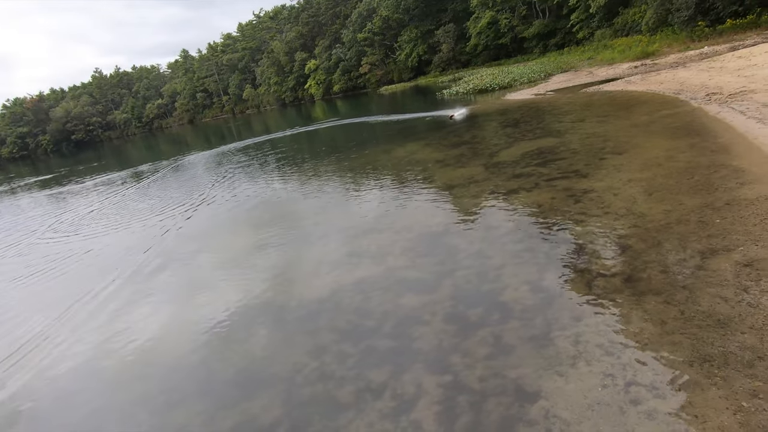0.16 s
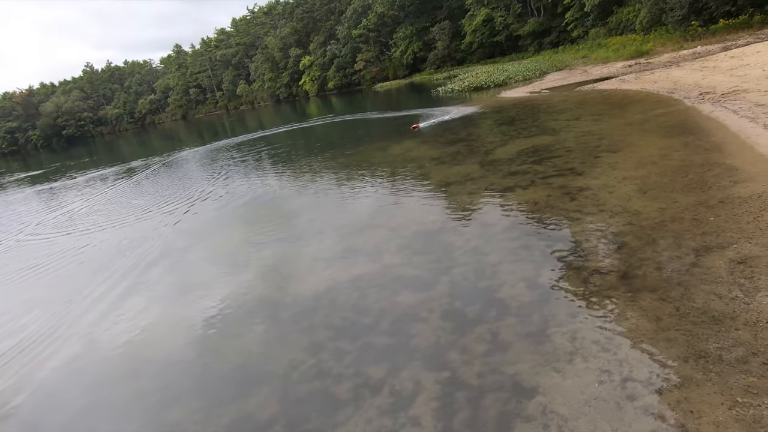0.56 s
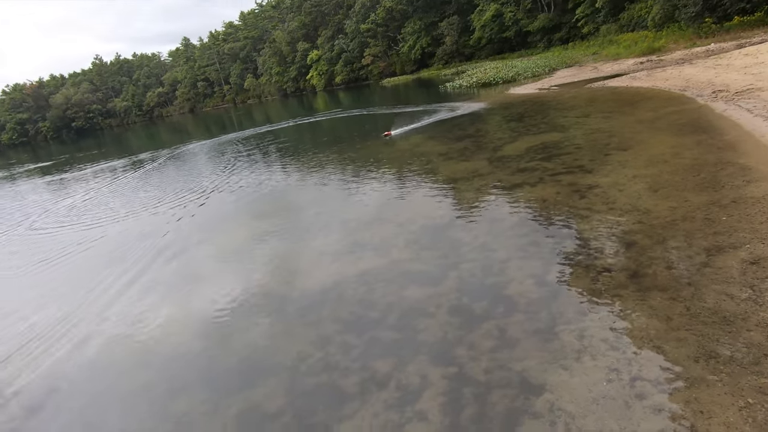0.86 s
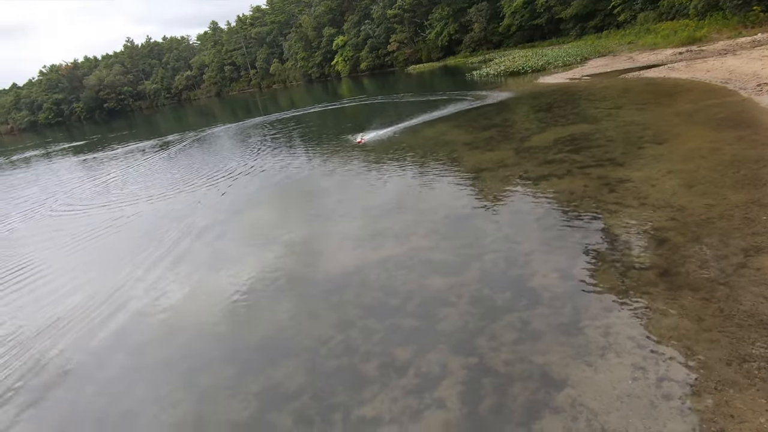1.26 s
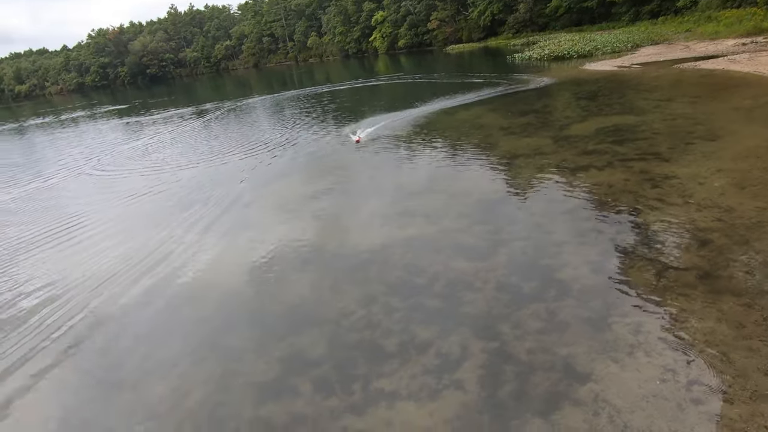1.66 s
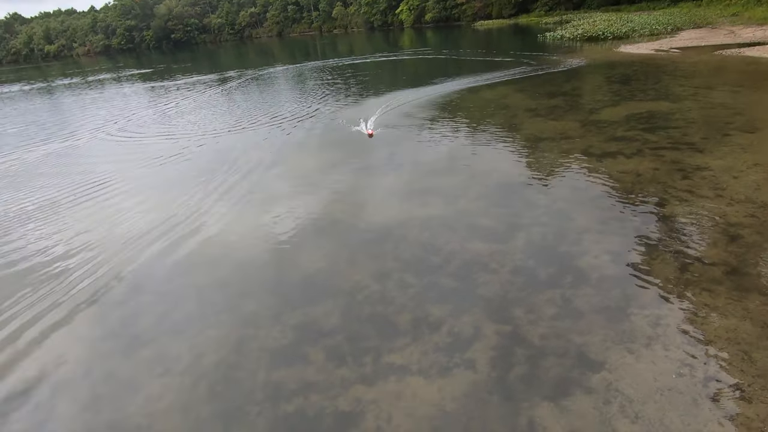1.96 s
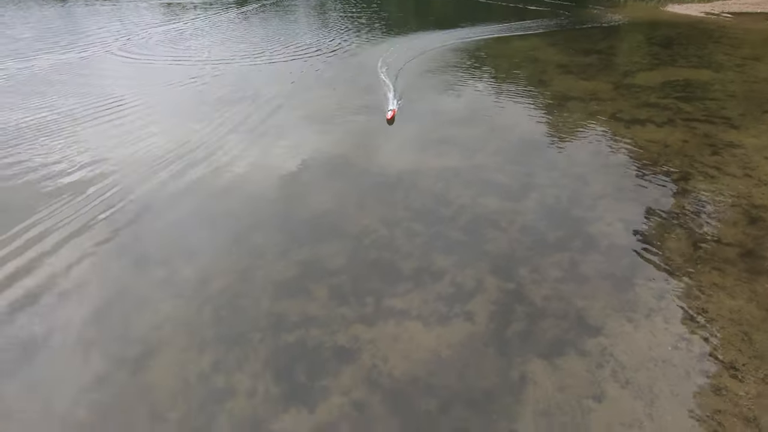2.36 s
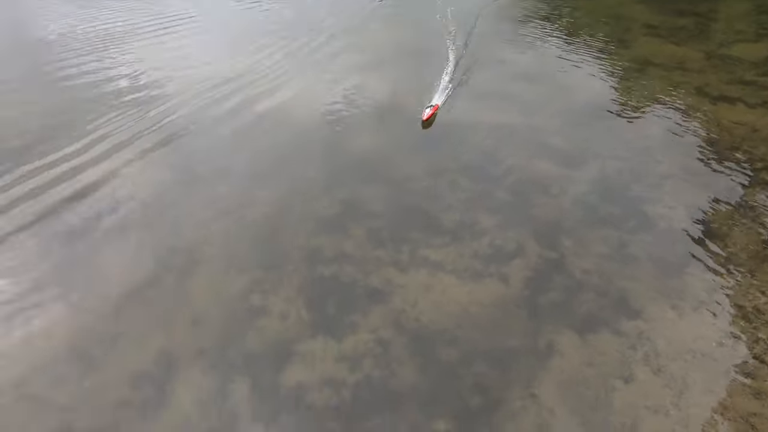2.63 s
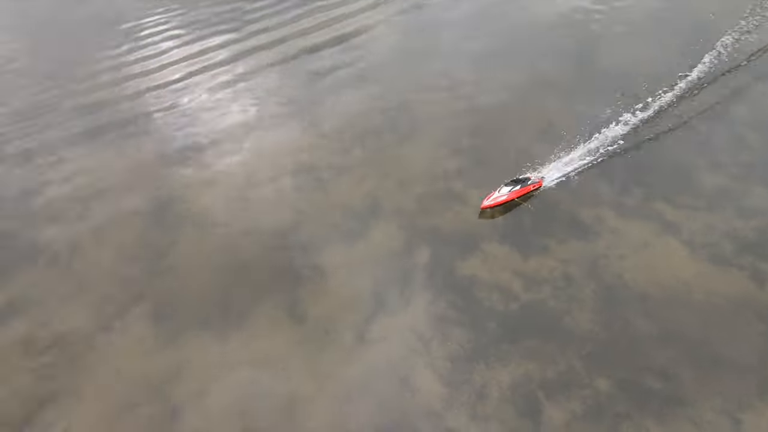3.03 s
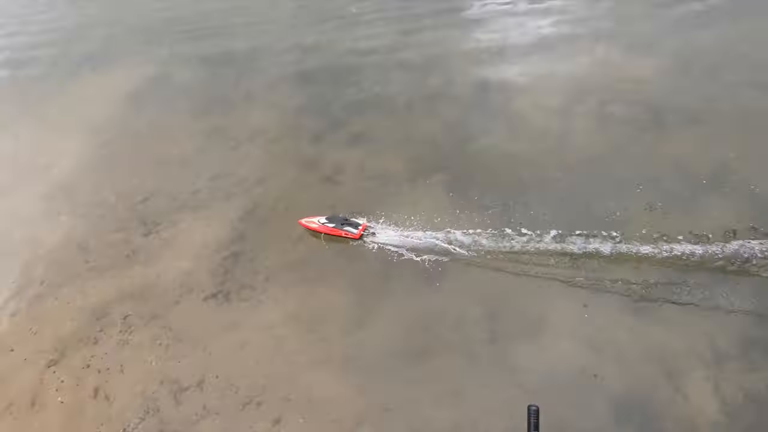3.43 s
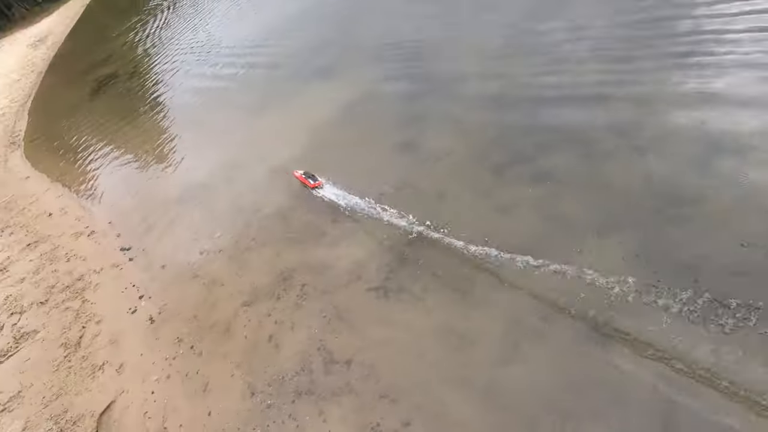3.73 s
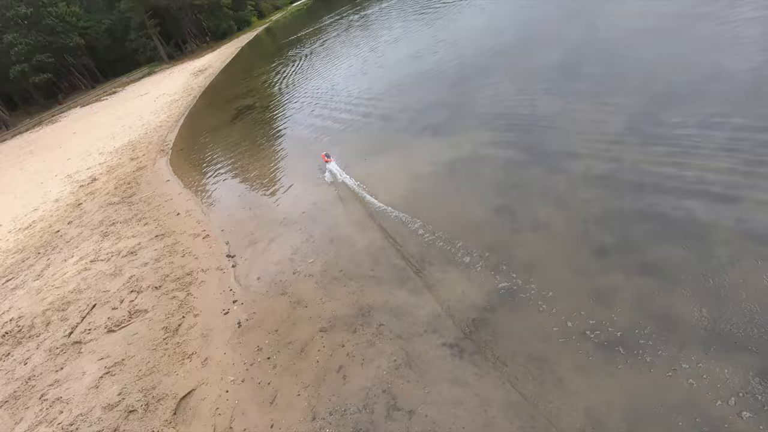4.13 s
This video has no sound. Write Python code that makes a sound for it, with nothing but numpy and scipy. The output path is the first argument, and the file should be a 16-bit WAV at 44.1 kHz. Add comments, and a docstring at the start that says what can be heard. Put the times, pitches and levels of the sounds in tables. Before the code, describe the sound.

A small electric model speedboat is heard from a lake shore, at first fairly distant: a buzzy, many-toned motor whine with a soft hiss of churned water. In the first half second the pitch flicks up briefly as the propeller lifts clear, then stays nearly steady while the tone colour keeps shifting. Light wind puffs on the microphone over a faint low rumble. From about 2 seconds, whine and water grow steadily louder. The boat passes close between about 3 and 3.7 seconds, slightly to the right, with a stronger hum, rushing spray and small splashes from the hull slapping waves. The strongest gust gives a low buffet at about 3.2 seconds, more on the left. From about 3.8 seconds the whine and churn fade as the boat leaves, and a fine mist brightens the hiss, still audible at the end near 4.3 seconds.

```python
"""A small electric model speedboat comes round a lake, its two-bladed propeller briefly racing clear of the
water. Motor and propeller whine through the hull, a stack of tones whose balance turns with the heading,
while the churned water hisses in step with the blades and a light wind buffets both microphone ports.
Just after three seconds the boat passes close by the shore, slapping waves as the strongest gust hits.
Then whine and churn fade as it leaves, and a fine mist brightens the hiss."""
import sys
import numpy as np
from scipy import signal
from scipy.fft import rfft, irfft
from scipy.io import wavfile
from scipy.ndimage import uniform_filter1d

SR = 44100
rng = np.random.default_rng(int(sys.argv[2]) if len(sys.argv) > 2 else 0)


def inscribe(sig):
    """Save sig as 16-bit PCM at rate SR to the path in sys.argv[1].

    A 1-D sig is mono; a 2-D sig holds one channel per row.
    Samples are clipped to [-1, 1] before scaling.
    """
    pcm = np.round(np.clip(np.atleast_2d(sig).T, -1, 1) * 32767)
    wavfile.write(sys.argv[1], SR, pcm.astype(np.int16))


N = 189365


def amp(db):
    """Decibels to gain."""
    return 10 ** (np.asarray(db) / 20)


def unit_rms(x):
    """Normalises to rms 1."""
    return x / np.sqrt(np.mean(abs(x) ** 2) + 1e-20)


def at_hz(points, hz):
    """Reads an EQ-style curve on a log frequency axis."""
    f, value = np.transpose(points)
    return np.interp(np.log(hz + 1), np.log(f + 1), value)


def lane(rows, column, t=None):
    """Plays one column of a table as an automation lane."""
    rows = np.array(rows)
    return np.interp(np.arange(N) / SR if t is None else t, rows[:, 0], rows[:, column])


def swells(rows, column, rise_s, fall_s):
    """An envelope with one bell-shaped swell per row, peaking at the row's time."""
    t = np.arange(N) / SR
    return sum(row[column] * np.exp(-((t - row[0]) / np.where(t < row[0], rise_s, fall_s)) ** 2)
               for row in rows)


def drift(top_hz, count):
    """Independent slow random modulators of rms 1."""
    white = rng.standard_normal((count, 4096))
    hz = np.fft.rfftfreq(4096, N / SR / 4096)
    slow = irfft(rfft(white) / (1 + (hz / top_hz) ** 2))
    slow /= slow.std(1, keepdims=True)
    return np.array([np.interp(np.linspace(0, 4095, N), np.arange(4096), row) for row in slow])


def pan(db):
    """Left and right gains, mean 1, for a pan given as left minus right in dB."""
    ratio = amp(db)
    return 2 * np.array([ratio, np.ones_like(ratio)]) / (1 + ratio)


# EQ of the wind rumble: f/Hz, level/dB
WIND_EQ = [(12, -26), (20, -14), (38, 5), (54, 11), (76, 4.5), (119, -8.5), (231, -33), (260, -3.5),
           (340, -39), (570, -120)]
# the stronger gusts: peak t/s, level/dB, pan/dB
GUSTS = [(0.0, -59, 0), (0.41, -59, 5), (0.58, -62, 4), (0.83, -53, 0.5), (1.39, -57, 3), (1.5, -58, 1),
         (1.83, -55, 0), (1.92, -64, 0), (2.159, -50.5, 0), (2.51, -59, 1), (2.72, -67, 0), (2.99, -52, 9),
         (3.17, -37.5, 4.5), (3.42, -43, 7), (3.94, -56, 7), (4.2, -64, -1)]


def wind():
    """Gusts buffet the two ports: a lumpy rumble, only partly shared between them."""
    even_n = N + N % 2
    hz = np.fft.rfftfreq(even_n, 1 / SR)
    white = rng.standard_normal((3, even_n))
    shared, left, right = irfft(rfft(white) * amp(at_hz(WIND_EQ, hz)))[:, :N]
    rumble = np.array([left + 0.81 * shared, right + 0.92 * shared])
    rumble *= amp(2.2 * drift(top_hz=8, count=2))
    gusts = [(t, amp(db + side / 2), amp(db - side / 2)) for t, db, side in GUSTS]
    strength = np.array([swells(gusts, port, rise_s=0.056, fall_s=0.06) for port in (1, 2)])
    return unit_rms(rumble) * (amp(-67) + strength)  # a faint floor between gusts


# the pass-by, also riding the water and whine faders: t/s, whine level/dB, water level/dB, nearness/0-1
PASS_BY = [(0.0, -41.5, -46.5, 0), (0.1, -45, -39.5, 0.03), (0.17, -37, -39, 0.3),
           (0.25, -40.5, -43.5, 0.1), (0.33, -38, -44.5, 0), (0.43, -36.5, -42.5, 0.2),
           (0.52, -31.5, -41, 0.37), (0.57, -38, -39.5, 0.17), (0.7, -36.5, -38.5, 0.38),
           (1.03, -35, -36.5, 0.26), (1.09, -40.5, -39.5, 0.2), (1.14, -37.5, -42.5, 0.04),
           (1.27, -36.5, -42, 0.07), (2.08, -36, -42, 0.12), (2.35, -33.5, -36.5, 0.27),
           (2.66, -29, -33, 0.38), (2.85, -28.5, -31, 0.52), (3.13, -23.5, -29.5, 0.44),
           (3.21, -27, -29, 0.88), (3.44, -26, -27, 1), (3.7, -28, -28, 1), (3.85, -29.5, -31.5, 0.52),
           (4.05, -31.5, -33.5, 0.45), (4.29, -34, -37.5, 0.25)]


def nearness(t=None):
    """Crossfade from the far colour (0) to the close colour (1) as the boat passes."""
    return lane(PASS_BY, 3, t)


# stereo width, boat far and near: f/Hz, left-right likeness/0-1
LIKENESS_FAR, LIKENESS_NEAR = [(60, 1), (200, 0.86), (400, 0.71), (1200, 0.8), (1550, 0.17), (1900, 1),
                               (3000, 1), (5000, 0.9), (5700, 0.74), (6800, 0.61), (7600, 0.41),
                               (9300, 0.37), (10500, .15), (14900, .35)], [(60, .3), (200, .8), (400, 1), (1200, 1), (1550, .85),
                                             (1900, 0.74), (3000, 1), (5000, 0.93), (6000, 1), (6800, 0.96),
                                             (8200, .3), (9300, 0.81), (10500, .12), (14900, .2)]
# pan across the spectrum, boat far and near: f/Hz, pan/dB
PAN_FAR, PAN_NEAR = [(60, -6), (400, 2.5), (900, -3.5), (1300, -2.5), (1600, 7), (2000, -1.5), (2700, -3),
                     (4200, -0.5), (5800, 2), (6800, -1.5), (7700, 1), (9000, 1.5), (10700, -10),
                     (12000, 1), (14900, -6)], [(60, 7.5), (400, -1.5), (900, 5), (1300, -1.5), (1700, -0.5), (2100, 1),
                                   (2700, -0.5), (4200, -1.5), (5800, 0.5), (6800, 9), (7500, 5),
                                   (9000, -1.5), (10700, -17.5), (12000, 0), (14900, -3)]
# how far the left port leads: f/Hz, phase/rad
LEFT_LEAD = [(100, -0.5), (1000, 0.67), (1450, 0.8), (1650, -0.35), (2400, 0.82), (3000, 0), (5500, 0),
             (6300, 0.5), (7200, 0.5), (8000, -2), (10000, -1.5), (11500, -5), (15000, 0)]


def hiss(far_eq, near_eq, patchy_db, flicker_db):
    """Stereo noise of rms 1 with drifting patches; its EQ and image morph from far to near."""
    hop = 128
    frames, hz = N // hop + 5, np.fft.rfftfreq(512, 1 / SR)
    left_re, left_im, other_re, other_im, patches = rng.standard_normal((frames, 257, 5)).T
    patches = uniform_filter1d(patches, size=6, axis=0)  # smear over frequency
    patches = unit_rms(uniform_filter1d(patches, size=16, axis=1))  # and over time
    flicker = unit_rms(uniform_filter1d(rng.standard_normal(frames), size=3))
    near = nearness(np.arange(frames) * hop / SR)

    def morph(far_curve, near_curve):
        return at_hz(far_curve, hz)[:, None] * (1 - near) + at_hz(near_curve, hz)[:, None] * near

    colour = amp(morph(far_eq, near_eq))
    colour /= np.sqrt((colour ** 2).mean(0))
    likeness = np.clip(morph(LIKENESS_FAR, LIKENESS_NEAR), 0, 1)
    left = left_re + 1j * left_im
    right = likeness * left + np.sqrt(1 - likeness ** 2) * (other_re + 1j * other_im)
    right *= np.exp(-1j * at_hz(LEFT_LEAD, hz))[:, None]
    spectra = np.array([left, right]) * pan(morph(PAN_FAR, PAN_NEAR)) * colour
    spectra *= amp(patchy_db * patches + flicker_db * flicker)
    return unit_rms(signal.istft(spectra, nperseg=512, noverlap=512 - hop)[1][:, :N])


# EQ of the lake ambience: f/Hz, level/dB
MURMUR_EQ = [(35, -46), (60, -6), (107, -4), (226, -5), (243, -7), (280, 3), (360, -39), (620, -120)]


def lake_murmur():
    """A steady low bed of wind over the lake; its stereo image shifts as the boat nears."""
    return amp(-57.5) * hiss(MURMUR_EQ, MURMUR_EQ, patchy_db=1.5, flicker_db=0.4)


# blade rate as heard on the shore: t/s, f/Hz
BLADE_RATE = [(0.0, 300.5), (0.27, 294), (0.5, 290.7), (0.6, 296), (0.92, 297.6), (1.06, 295), (2.02, 294),
              (2.58, 298.8), (2.71, 298), (3.13, 298.7), (3.44, 293.6), (3.79, 293.3), (3.95, 290.9),
              (4.06, 293), (4.16, 289.8), (4.29, 293.8)]
# the propeller breaks out of the water and races: peak t/s, extra f/Hz, extra water level/dB
RACES = [(0.0, 5.6, 1.5), (0.185, 25.7, -0.5), (0.375, 12, 3)]
RACE_RISE_S, RACE_FALL_S = 0.04, 0.025


def propeller():
    """Running count of blade passes, the clock for water and whine; the chop makes the speed tremble."""
    hz = lane(BLADE_RATE, 1) + swells(RACES, 1, RACE_RISE_S, RACE_FALL_S)
    tremble = 1 + 0.00177 * drift(top_hz=14, count=1)[0]
    return np.cumsum(hz * tremble) / SR


# EQs of the three water layers, boat far and near: f/Hz, level/dB
CHURN_FAR, CHURN_NEAR = [(100, -35), (200, -28), (440, -14), (740, -7.5), (1030, -6.5), (1330, -11.5),
                         (1620, -8.5), (2200, -6.5), (2800, -3), (3400, -3), (4000, -9.5), (4600, -25),
                         (5200, -15.5), (6500, -38), (9000, -89)], [(100, -50), (200, -48), (440, -17.5), (740, -21.5), (1030, -4),
                                            (1330, -2.5), (1620, -7), (2200, 0), (2800, 1.5), (3400, 2),
                                            (4000, -3), (4600, -4.5), (5200, -11), (6500, -35), (9000, -88)]
SPRAY_FAR, SPRAY_NEAR = [(2470, -30), (4200, 2.5), (4570, 1.5), (5290, -10), (5740, -4.5), (6970, -1.5),
                         (7740, -14), (8600, -17), (11200, -40), (18900, -120)], [(2240, -16.5), (3800, -14), (4010, -19), (4070, -33),
                                            (4980, -5.5), (5750, 1), (6500, 1), (7100, -4), (8600, -14.5),
                                            (11200, -39), (18900, -120)]
MIST_FAR, MIST_NEAR = [(6000, -28), (8000, 6), (8600, -5), (9500, -5.5), (10300, -5), (11000, -20),
                       (11800, -26), (13000, -19), (14500, -24), (15400, -30)], [(6000, -31), (8000, -6), (8600, -12), (9300, 6), (10200, -7.5),
                                         (11000, -14), (11800, -16), (13000, -15), (14500, -21),
                                         (15400, -30)]
# mist fader, relative to the churn: t/s, level/dB
MIST_FADER = [(0, -21), (.3, -19), (.6, -27), (1.03, -29), (1.15, -20), (2.1, -18), (2.3, -20.5), (3., -20),
              (3.44, -19), (3.9, -15.5), (4.2, -8.5), (4.29, -2)]
# the hull slaps a wave and throws up water: peak t/s, extra level/dB
SPLASHES = [(0.57, 1.5), (1.03, 1), (2.16, 1.5), (2.58, -1.5), (2.95, 3.5), (3.04, 1), (3.17, 1.5),
            (3.27, 2.5), (3.44, 1), (3.6, 1), (3.72, 1), (3.91, 2), (4.05, 2)]
SPRAY_FAR_DB, SPRAY_NEAR_DB = -6.5, -4.5  # relative to the churn
CHOP_DB, CHOP_HZ = 1, 4  # the chop shakes each layer's level


def water(blade_passes):
    """Churn behind the hull, spray and fine mist, each puffing as a blade breaks the surface."""
    def puff(depth):
        angle = 2 * np.pi * blade_passes
        return unit_rms(1 + depth * np.cos(angle) + 0.35 * depth * np.cos(2 * angle + 0.46))

    near = nearness()
    water_db = lane(PASS_BY, 2) + swells(RACES, 2, RACE_RISE_S, RACE_FALL_S)
    water_db += swells(SPLASHES, 1, rise_s=0.012, fall_s=0.029)
    churn_db, spray_db, mist_db = water_db + CHOP_DB * drift(CHOP_HZ, count=3)
    spray_db += SPRAY_FAR_DB * (1 - near) + SPRAY_NEAR_DB * near
    mist_db += lane(MIST_FADER, 1)
    churn = amp(churn_db) * puff(0.13) * hiss(CHURN_FAR, CHURN_NEAR, patchy_db=1.93, flicker_db=0.8)
    spray = amp(spray_db) * puff(0.18) * hiss(SPRAY_FAR, SPRAY_NEAR, patchy_db=1.6, flicker_db=1.0)
    mist = amp(mist_db) * puff(0.11) * hiss(MIST_FAR, MIST_NEAR, patchy_db=1.3, flicker_db=0.59)
    return churn + spray + mist


# five timbres of the hull: multiple of the blade rate, then level/dB in each timbre
HULL_TIMBRES = [(3.09, -5, -35, -37, -32, 0.5), (4, -8.5, -37, -9, -9.5, -19),
                (5, -22, -1.5, -42, -34, -52), (6, -19.5, -10, -1, -37, -42), (7, -26, -19, -29, 2.5, -33),
                (7.82, -22, -3, -4.5, -24, -22), (9.04, -39, -1, -9, -24, -10.5),
                (10, -2, -35, -4, -20, -32), (10.96, -28, -17, -5, -25, -7.5),
                (12, -42, -43, -6.5, -27, -2), (13.1, -33, -32, -2.5, -18, -13.5),
                (13.9, -28.5, -36, -12.5, -37, -20), (15, -24, -37, -11, -43, -23.5),
                (15.595, -17, -25, -17, -53, -15), (17.5, -30, -30, -37, -49, -26.5),
                (19.6, -37.5, -28, -18, -32, -19), (22, -27, -38, -19, -34, -28)]
# the mix that reaches the shore as the heading changes: t/s, then gain/0-1 of each timbre
HEADING_MIX = [(0, 0.35, 0.23, 0.088, 0.34, .05), (.1, .3, 0.33, 0.29, 0.34, .1),
               (.2, .4, 0.29, 0.17, 0.23, 0.14), (.3, 0.11, .05, 0.44, 0.046, 0.39),
               (.38, 0.37, 0.11, 0.16, .3, .4), (.44, 0.15, 0.15, 0.36, 0.18, 0.42),
               (.5, 0.056, 0.27, 0.35, 0.33, 0.21), (.54, .02, 0.51, 0.52, 0.41, 0.16),
               (.6, 0.41, 0.077, .65, 0.29, 0.024), (1.08, .33, .03, 1, 0.12, 0.067),
               (1.12, 0.66, .1, 0.049, 0.37, .3), (1.36, 0.21, 0.075, .1, 0.27, .4),
               (1.44, 0.18, .25, 0.047, .2, 0.82), (1.6, 0.21, 0.12, 0.077, 0.13, 0.88),
               (1.68, .5, .2, 0.11, .12, 0.32), (1.82, 0.18, 0.12, 0.16, 0.13, 0.88),
               (1.92, 0.65, 0.077, .35, .1, 0.072), (2.02, 0.52, 0.072, 0.14, 0.18, .65),
               (2.14, 0.39, 0.18, .3, .2, .3), (2.19, 0.15, 0.17, 0.44, 0.45, 0.084),
               (2.6, 0.082, 0.076, 0.68, 0.58, 0.041), (3.14, 0.014, 0.15, 0.35, 0.66, 0.037),
               (3.27, 0.39, 0.8, .03, .1, 0.16), (3.38, 0.29, 0.57, .03, 0.077, 0.089),
               (3.45, 0.38, 0.36, .1, .2, 0.23), (3.55, 0.18, .3, 0.18, 0.42, 0.28),
               (3.64, 0.19, 0.4, .1, 0.58, 0.22), (3.77, 0.41, 0.12, .03, 0.64, 0.19),
               (4.29, 0.29, 0.12, 0.13, 0.47, .15)]
# unlike blades add odd shaft harmonics: multiple of the blade rate, level/dB relative to the whine
SHAFT_TONES = [(4.5, -30.5), (5.5, -31), (7.5, -20.5), (8.5, -41), (10.5, -24), (11.5, -48)]
# the two lowest tones leave the hull evenly all round: t/s, first level/dB, second level/dB
HUM = [(0.0, -56, -58), (0.18, -53, -55.5), (0.27, -57.5, -55.5), (0.6, -55.5, -50.5), (1.01, -54, -49),
       (1.11, -59, -55.5), (1.5, -57.5, -49.5), (2.03, -56, -44.5), (2.33, -47, -43), (2.62, -46, -43),
       (2.9, -42.5, -39), (3.14, -39.5, -33), (3.44, -37.5, -38), (3.8, -43.5, -40), (4.29, -49, -46)]


def hull_tones():
    """What the hull radiates towards the shore, as (multiple of the blade rate, gain envelope) pairs."""
    table, columns = np.array(HULL_TIMBRES), range(1, 6)
    harmonics = np.arange(3, 24)
    timbres = np.array([amp(np.interp(harmonics, table[:, 0], table[:, j])) for j in columns])
    gains = timbres.T @ np.array([lane(HEADING_MIX, j) for j in columns])
    gains /= np.linalg.norm(gains, axis=0)  # the heading changes colour at constant power
    fader = amp(lane(PASS_BY, 1))
    shaft = [(order, amp(db) * fader) for order, db in SHAFT_TONES]
    hum = [(order, amp(lane(HUM, order))) for order in (1, 2)]
    return list(zip(harmonics, gains * fader)) + shaft + hum


def whine(blade_passes, flutter_db=2.5, wander_rad=0.096, spread_rad=0.21):
    """Motor and propeller sing on the blade rate; higher tones flutter, wander and spread more."""
    tones = hull_tones()
    spread = drift(top_hz=7.6, count=len(tones))
    flutter = drift(top_hz=12.8, count=len(tones))
    wander = drift(top_hz=14.0, count=len(tones))
    start = rng.random(len(tones))
    out, near = np.zeros((2, N)), nearness()
    for i, (order, gain) in enumerate(tones):
        angle = 2 * np.pi * (order * blade_passes + start[i]) + wander_rad * np.sqrt(order) * wander[i]
        peak = np.sqrt(2) * gain * amp(flutter_db * min(order / 7, 1.3) * flutter[i])
        pan_db = at_hz(PAN_FAR, order * 296.0) * (1 - near) + at_hz(PAN_NEAR, order * 245.0) * near
        right_lag = at_hz(LEFT_LEAD, order * 240.0) - spread_rad * min(order / 5, 1) * spread[i]
        out += peak * pan(pan_db) * np.cos([angle, angle - right_lag])
    return out


# the boat leans to the right as it passes: t/s, pan/dB
BOAT_PAN = [(0, -0.2), (1, -0.5), (2, -0.5), (2.6, -0.9), (3.1, -2.4), (3.5, -2.1), (4, -0.3), (4.29, -0.7)]


def scene():
    """The mix: whine and water pan together, over gusting wind and a low lake murmur."""
    blade_passes = propeller()
    boat = whine(blade_passes) + water(blade_passes)
    side_db = lane(BOAT_PAN, 1) / 2
    return boat * amp([side_db, -side_db]) + wind() + lake_murmur()


def record(dry):
    """A steep high cut on the whole mix."""
    high_cut = signal.firwin(511, cutoff=15300, window=("kaiser", 9), fs=SR)
    return signal.oaconvolve(dry, high_cut[None], "same")


dry = scene()
out = record(dry)
inscribe(out)
```